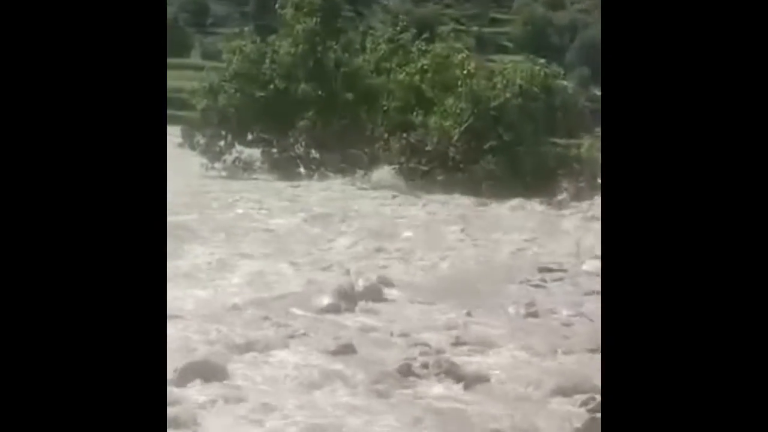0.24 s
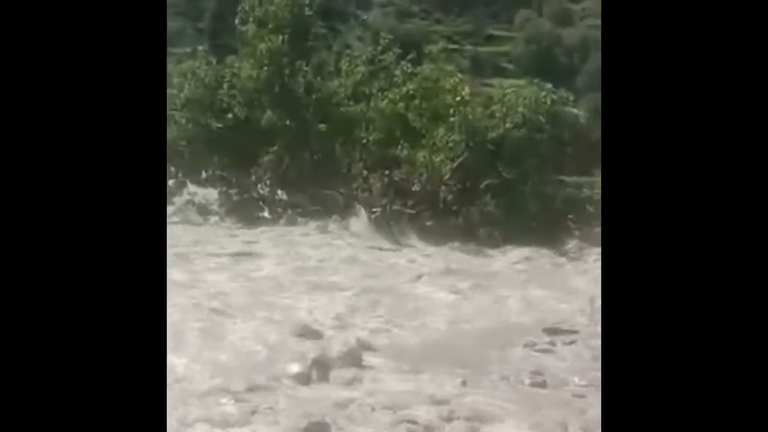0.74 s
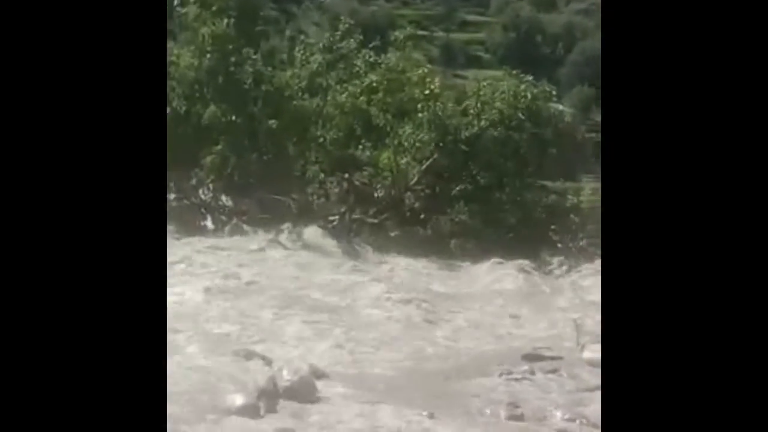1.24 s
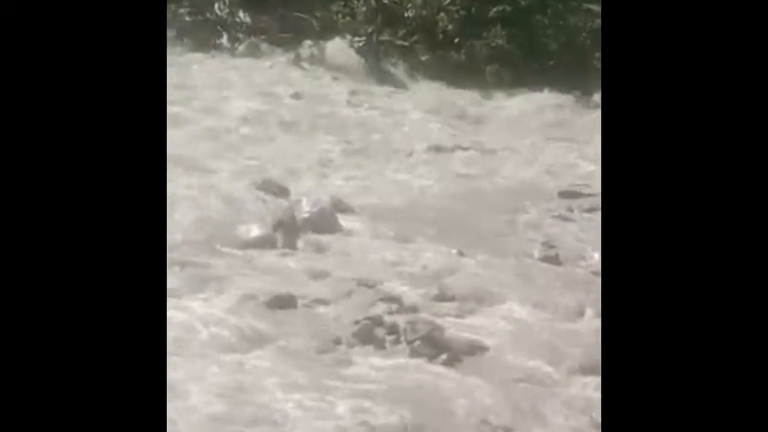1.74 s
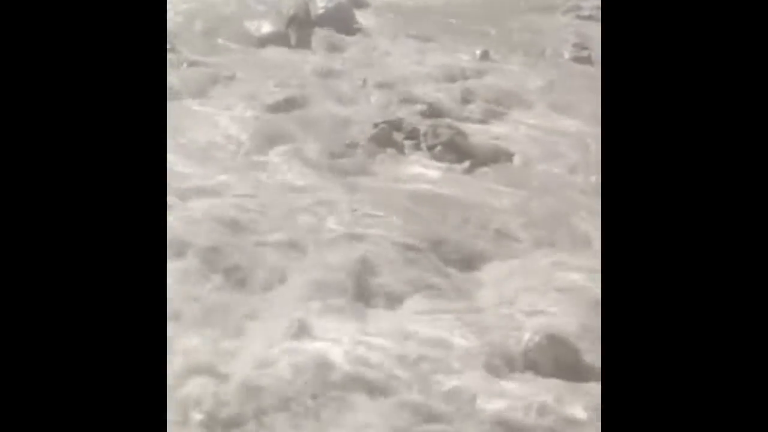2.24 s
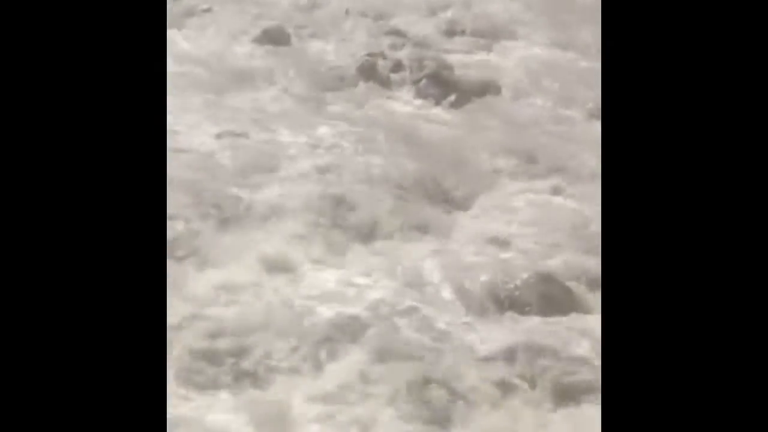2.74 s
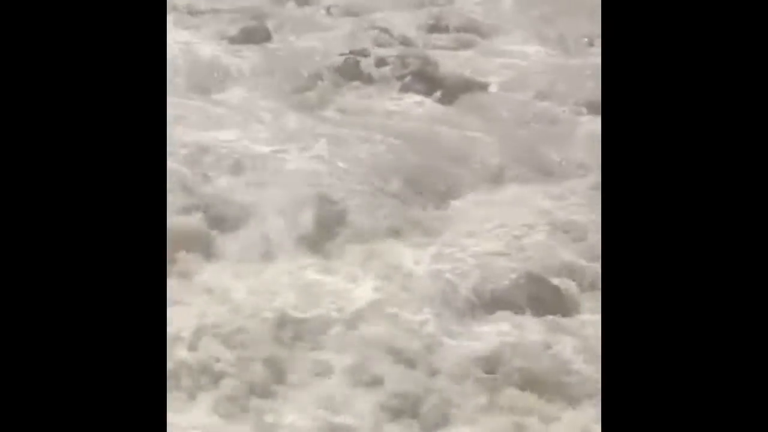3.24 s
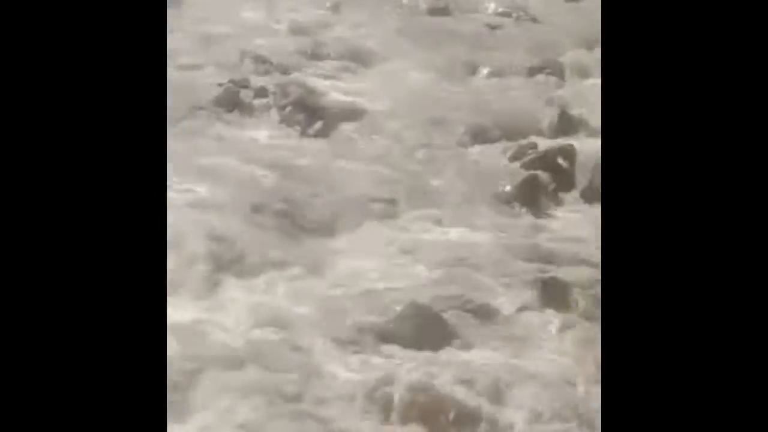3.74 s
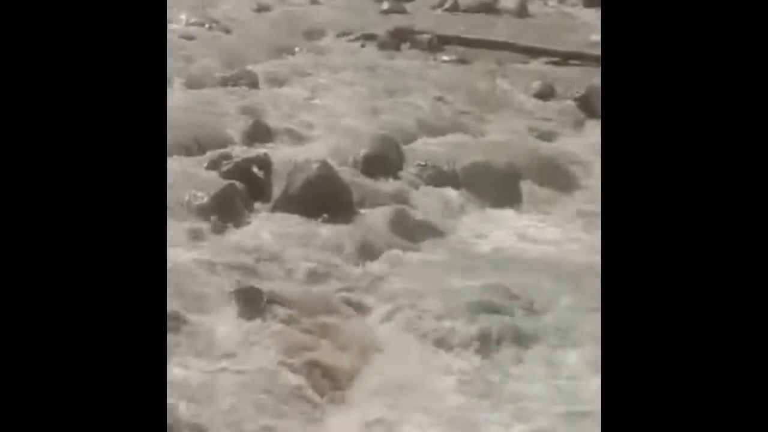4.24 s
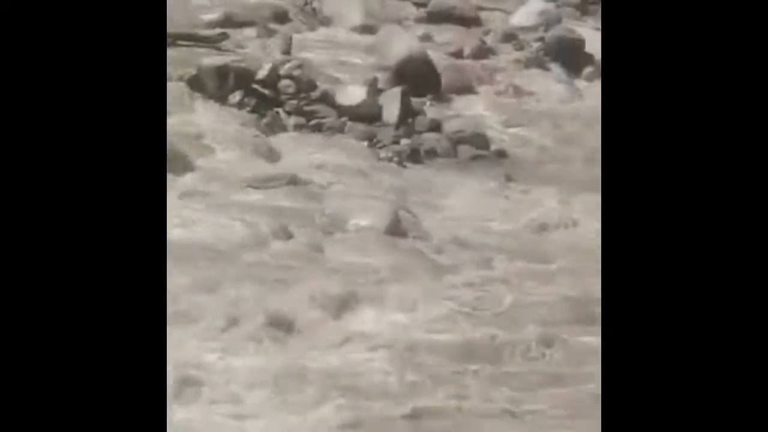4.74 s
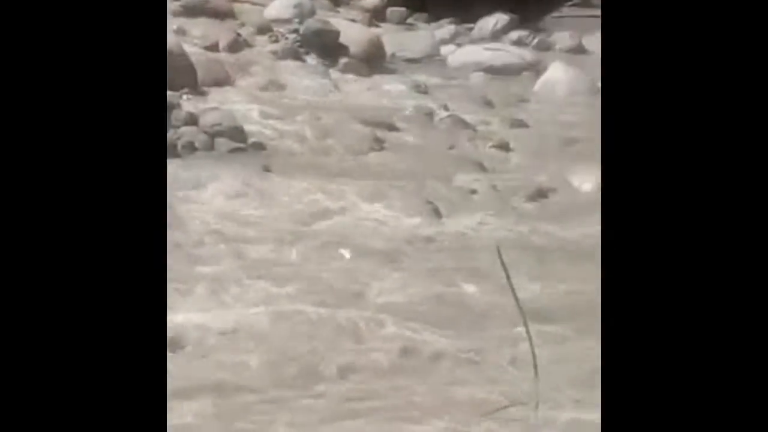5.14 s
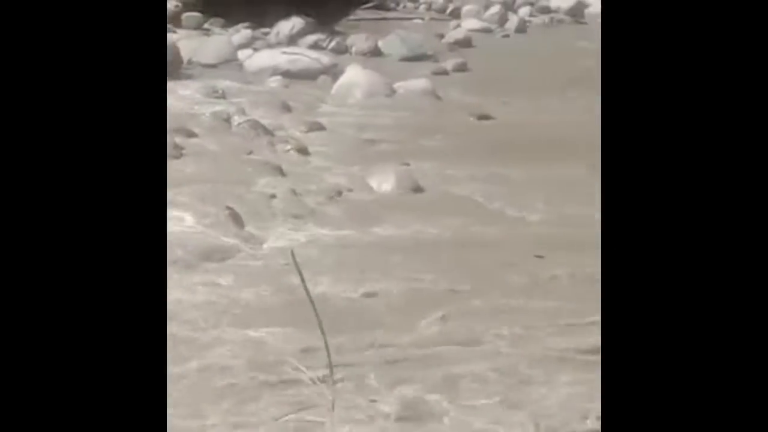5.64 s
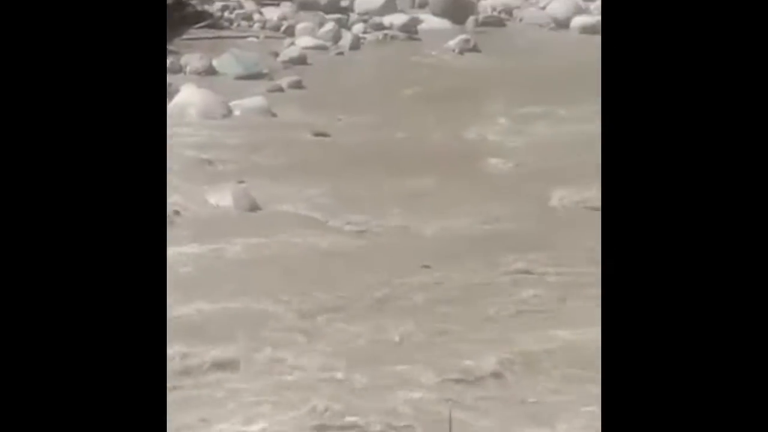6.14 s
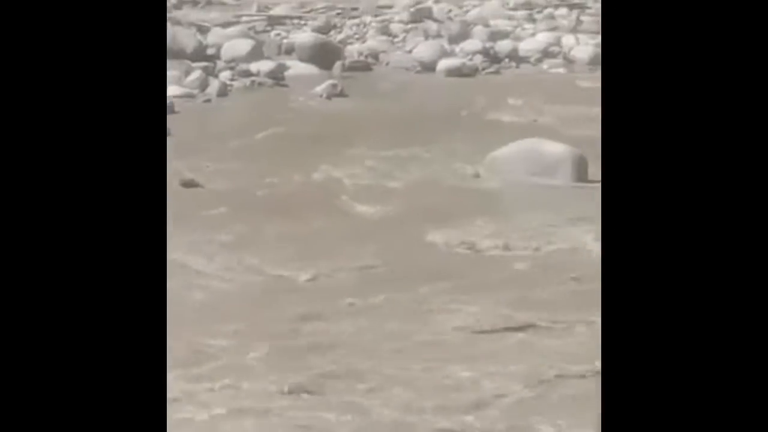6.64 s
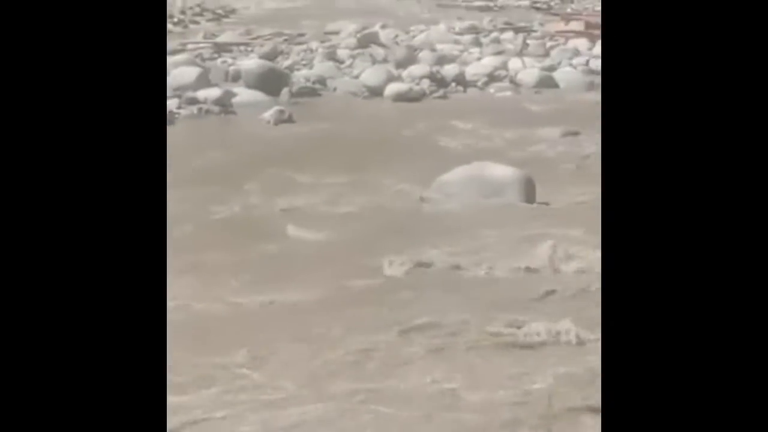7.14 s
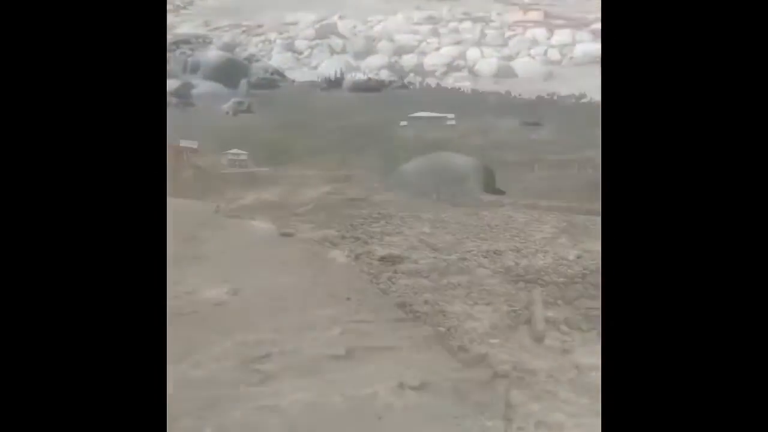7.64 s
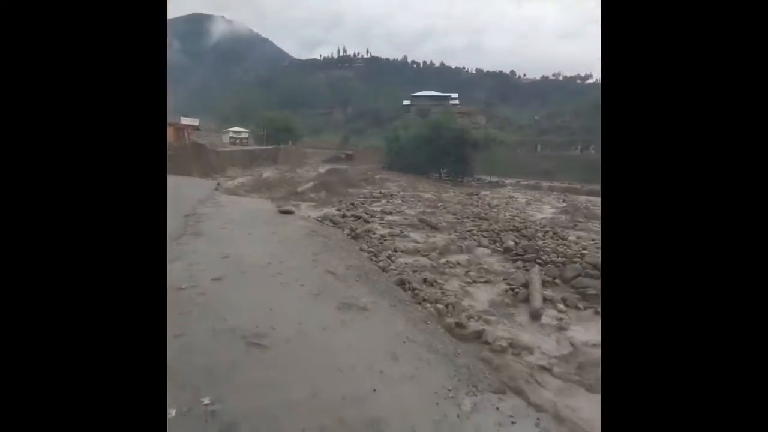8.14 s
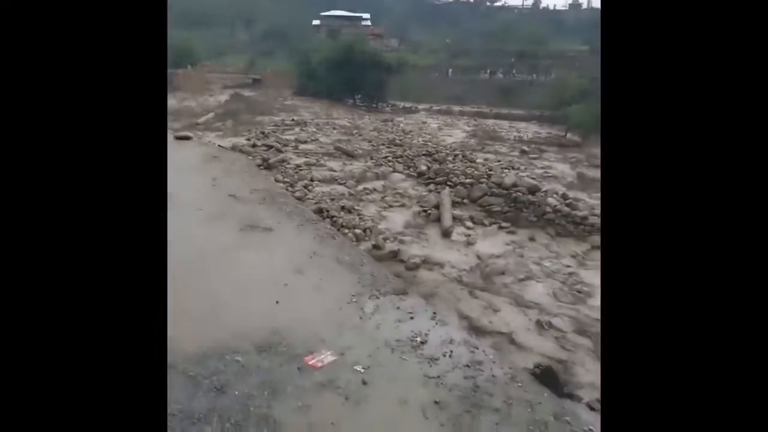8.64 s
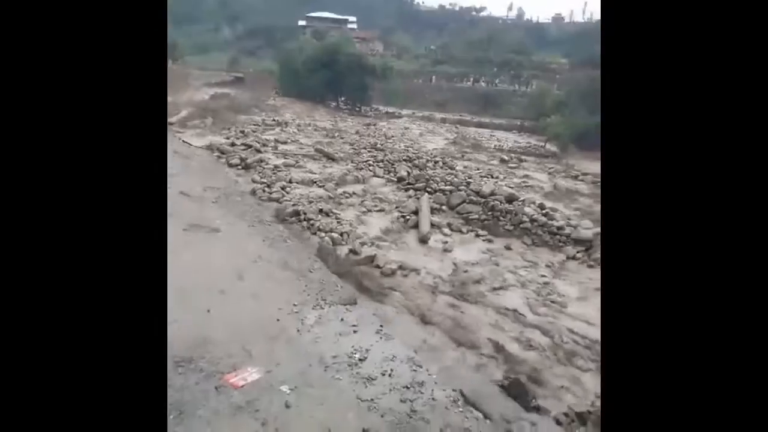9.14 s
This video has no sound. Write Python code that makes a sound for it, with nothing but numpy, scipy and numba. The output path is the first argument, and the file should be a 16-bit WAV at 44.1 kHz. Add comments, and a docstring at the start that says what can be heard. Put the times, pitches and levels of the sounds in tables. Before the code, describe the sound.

Muddy floodwater roars dully over boulders with an uneven low rumble, then gives way to a deeper, surging flow of mud and gravel.

```python
"""A muddy flood pours over boulders, dull and in mono: first rapids, then stony shallows from about 3.8 s,
then the open channel from about 6.3 s. Throughout, a low rumble swells and dips irregularly, clouds of
resonating bubbles roar, and droplets tinkle in the spray under a faint fizz and hiss. From 7.3 to 8.3 s
the river dissolves into a wider, deeper flow of mud: a surging rumble, rushing water, a brief splash and
hissing gravel, bright on the right and muffled on the left."""
import sys
import numpy as np
from scipy import signal
from scipy.fft import rfft, irfft
from scipy.io import wavfile
from scipy.ndimage import uniform_filter1d
from numba import njit

SR = 44100
rng = np.random.default_rng(int(sys.argv[2]) if len(sys.argv) > 2 else 0)


def wrap_up_sound(samples):
    """Save the sound to the file named by the first command line argument, as 16-bit audio."""
    columns = np.atleast_2d(samples).T
    # keep every value between -1 and 1, then stretch to whole-number steps
    tamed = np.clip(columns, -1, 1)
    steps = np.round(tamed * 32767).astype(np.int16)
    wavfile.write(sys.argv[1], SR, steps)


N = 414540
T = np.arange(N) / SR
FREQS = np.fft.rfftfreq(N, 1 / SR) + 1e-3


def undb(db):
    """Amplitude ratio of a level in decibels."""
    return 10 ** (np.asarray(db) / 20)


def unit(x):
    """Normalisation to rms 1."""
    return x / np.sqrt(np.mean(x ** 2))


def curves(table):
    """Linear interpolation in time, one curve per column."""
    times, *columns = np.transpose(table)
    return [np.interp(T, times, column) for column in columns]


def swells(events, half_s):
    """Superposition of Gaussian bells, one per event; one curve per column."""
    times, *columns = np.transpose(events)
    bells = np.exp(-((T - times[:, None]) / half_s) ** 2)
    return [heights @ bells for heights in columns]


def response(points):
    """Frequency response through (Hz, dB) points, interpolated over log frequency."""
    hz, db = np.transpose(points)
    return undb(np.interp(np.log(FREQS), np.log(hz), db))


def band(lo_hz, hi_hz, order=8):
    """Magnitude response of a Butterworth band-pass."""
    return ((1 + (lo_hz / FREQS) ** (2 * order)) * (1 + (FREQS / hi_hz) ** (2 * order))) ** -.5


def shape(x, gain):
    """Filtering as multiplication of the spectrum."""
    return irfft(rfft(x) * gain, N)


def smooth(x, size):
    """Low-pass filtering by two moving averages of size samples."""
    return uniform_filter1d(uniform_filter1d(x, size), size)


def wander(rate):
    """Smoothed sample-and-hold noise: rate values a second, spread near 1."""
    hold = int(SR / rate)
    steps = np.repeat(rng.standard_normal(N // hold + 1), hold)
    return 1.41 * smooth(steps, hold)[:N]


def steady(x, span_s):
    """Compression: division by the running rms evens out swells and keeps the grain."""
    return x / np.sqrt(smooth(x ** 2, int(span_s * SR)) + np.mean(x ** 2) / 20)


@njit
def ring(start, hz, cycles, size, glide):
    """Bubble resonance: each is a damped sine whose pitch rises as it nears the surface."""
    out = np.zeros(N)
    for k in range(len(start)):
        length = int(cycles[k] * SR / hz[k])
        step = 2 * np.pi * hz[k] / SR
        phasor = size[k] + 0j
        turn = np.exp(1j * step - 5.8 / length)  # decays 50 dB over its life
        rise = np.exp(1j * step * glide / length)
        for i in range(start[k], min(start[k] + length, N)):
            phasor *= turn
            turn *= rise
            out[i] += phasor.imag
    return out


def bubbles(lo_hz, hi_hz, cycles, spread_db, count):
    """Incoherent sum: bubbles of scattered sizes give about equal power per Hz."""
    when, pitch, life, strength = rng.random((count, 4)).T
    hz = lo_hz * (hi_hz / lo_hz) ** pitch
    size = hz * undb(-spread_db * np.log(1 - .99 * strength))
    cloud = ring((when * N).astype(np.int64), hz, cycles * (.5 + life), size, glide=.2)
    return unit(cloud) * np.sqrt((hi_hz - lo_hz) / (SR / 2))


def water(cloud, wash_db):
    """Central limit theorem: countless far bubbles merge into Gaussian noise behind the near ones."""
    return cloud + undb(wash_db) * rng.standard_normal(N)


# Spectra of the three stretches of river. Each row: frequency in Hz, relative density in dB.
RAPIDS_SPECTRUM = [(20, -46.5), (42, -32.5), (72, -17.5), (105, -4.5), (140, -6.5), (200, -2.5), (280, -1),
                   (410, -4.5), (580, -1), (820, -2.5), (1350, -1.5), (1680, -3.5), (2050, -16.5),
                   (2400, -20), (2800, -16.5), (3450, -19.5)]
SHALLOWS_SPECTRUM = [(20, -45.5), (42, -34), (75, -13.5), (120, -5.5), (230, 0), (450, -2), (900, -4.5),
                     (1230, -6), (1480, -6), (1610, -2.8), (1725, -1.2), (1830, -10.5), (1950, -14.5),
                     (2450, -20.5), (2950, -24.5), (3500, -21)]
CHANNEL_SPECTRUM = [(20, -51), (45, -37), (80, -14), (125, -4.5), (280, 1.5), (500, -2.5), (900, -2.5),
                    (1250, -2.5), (1600, -2), (1720, -3.5), (1860, -10), (2100, -19.5), (2400, -22.5),
                    (3080, -26), (3500, -21.5)]
def register(source, weights, passband):
    """Source and filter: one band of the water's spectrum, coloured by each stretch and blended."""
    colours = RAPIDS_SPECTRUM, SHALLOWS_SPECTRUM, CHANNEL_SPECTRUM
    stretches = [unit(irfft(source * response(colour) * passband, N)) for colour in colours]
    return unit(sum(weight * stretch for weight, stretch in zip(weights, stretches)))


# Irregular swells in the low rumble. Each row: time in seconds, lifts of deep, roll and low roar in dB.
LOW_SWELLS = [(.03, 4, 3.5, 0.5), (.24, 1, 0.5, 0.5), (.45, 9.5, 3.5, 0), (.51, 1, 3.5, 1),
              (.6, -4, 1.5, 1.5), (1.0, 3, -3, 1), (1.15, 9, 1, 0), (1.22, 8, 1, 1.5), (1.36, 8, -0.5, -2),
              (1.58, 6.5, 0.5, -0.5), (1.77, 7.5, 2.5, 1), (2.27, 6.5, 4.5, 3), (2.56, 5, -3, 2),
              (2.77, 7.5, 1, 3), (2.9, 6, 1.5, 1.5), (3.09, 4, 4.5, 0.5), (3.2, -2, 1.5, 2),
              (3.37, -2, 1, 3.5), (3.48, 6.5, 0, 1), (3.58, 6, 4.5, 5), (3.68, 14, 2, 2),
              (3.96, 7, -3.5, -1.5), (4.05, -4, 3, -0.5), (4.17, 9, -0.5, 0.5), (4.3, 1, 6, 1.5),
              (4.66, 5, 2, -0.5), (4.81, 6.5, 2.5, -0.5), (4.96, 3, 2.5, -2.5), (5.12, 5.5, -1.5, 1.5),
              (5.46, 8.5, 4.5, 1), (5.65, 4, 1.5, -1.5), (5.73, 1, 3.5, 0), (6.07, 9.5, 2, 2),
              (6.34, 4, 1.5, 2.5), (6.56, 14.5, -1, 1), (6.67, -1, 3.5, -0.5), (7.11, 8.5, -2, 1),
              (7.38, 5.5, 2, -0.5)]
# Irregular dips in the low rumble. Each row: time in seconds, changes of deep and roll in dB.
LOW_DIPS = [(.14, -1, 1), (.36, -7, -1), (.82, -5, 0), (1.09, -6, 0), (1.42, 1, -2), (1.86, -10, -1.5),
            (2.03, -6, -4), (2.13, -4, -5), (2.44, -8, 0), (2.97, -3, 0), (3.17, -7, 2), (3.8, -5, -4),
            (4.23, -7, -6.5), (4.87, -9, -0.5), (5.55, -9, 0), (6.14, -1, -4.5), (6.47, -1, -6.5),
            (6.86, -6, 0.5)]
# Breaking crests. Each row: time in seconds, lift of the upper roar in dB.
CRESTS = [(1.55, 1.7), (7.12, 1.5)]
def rumble_and_roar(source, weights, roar_db):
    """Amplitude modulation: the river's low bands swell and dip irregularly; crests brighten the roar."""
    deep_db, roll_db, low_roar_db = swells(LOW_SWELLS, half_s=.04)
    deep_dip_db, roll_dip_db = swells(LOW_DIPS, half_s=.04)
    crest_db, = swells(CRESTS, half_s=.22)
    deep = steady(register(source, weights, band(30, 146, order=16)), span_s=.15)
    deep *= undb(-39.5 + deep_db + deep_dip_db + .6 * wander(16))
    roll = steady(register(source, weights, band(155.5, 289, order=16)), span_s=.089)
    roll *= undb(-29.5 + roll_db + roll_dip_db + wander(16))
    roar = steady(register(source, weights, band(308, 2010, order=32)), span_s=.2) * undb(roar_db)
    low_lift = shape(roar, band(250, 700)) * (undb(low_roar_db) - 1)
    crests = shape(roar, band(1080, 1670, order=16)) * (undb(crest_db) - 1)
    return deep + roll + roar + low_lift + crests


def flutter(x, lo_hz, hi_hz, depth_db, rate, count):
    """Independent modulation: each of count narrow bands rises and falls on its own."""
    spectrum = rfft(x)
    which = np.digitize(FREQS, np.linspace(lo_hz, hi_hz, count + 1)[1:-1])
    return sum(irfft(spectrum * (which == k), N) * undb(depth_db * wander(rate)) for k in range(count))


def spray(source, weights, level_db):
    """Random modulation: narrow bands of the high hiss waver, more deeply after about 3.8 s."""
    early_depth_db, late_depth_db = 1.5, 2.5
    depth_db = late_depth_db + (early_depth_db - late_depth_db) * weights[0]
    treble = register(source, weights, band(2076, 3543, order=56))
    treble = flutter(treble, 2000, 3600, depth_db, rate=38, count=13)
    return steady(treble, span_s=.1) * undb(level_db)


# Spectrum of the hiss. Each row: frequency in Hz, relative density in dB.
HISS_SPECTRUM = [(4500, -20.5), (9000, -13.5), (11800, -9.5), (12800, -6), (14000, -9.5), (15300, -2),
                 (15700, -17)]
def hiss():
    """Filtered white noise, barely audible."""
    return unit(shape(rng.standard_normal(N), response(HISS_SPECTRUM) * band(4000, 16000))) * undb(-82)


# Spectrum of the fizz. Each row: frequency in Hz, relative density in dB.
FIZZ_SPECTRUM = [(3700, -2.5), (3850, 0), (4100, -9), (4350, -12), (4650, -29.5), (4950, -24),
                 (5200, -12.5), (6100, -13), (6400, -1), (6850, 0), (7250, -11.5), (7750, -8.5),
                 (8300, -18), (9200, -32.5)]
def fizz(level_db):
    """Resonance rises as radius falls: tiny bubbles glint above the spray."""
    cloud = water(bubbles(3600, 9500, cycles=150, spread_db=1.1, count=14000), wash_db=-2.5)
    bed = shape(cloud, response(FIZZ_SPECTRUM) * band(3600, 9500, order=48))
    top = shape(bed, band(6250, 8400, order=48))
    glints = unit(flutter(top, 6250, 8400, depth_db=3.5, rate=40, count=16)) * np.std(top)
    return unit(bed - top + glints) * undb(level_db)


# Splashes at the top of the spray. Each row: time of the peak in seconds, level in dB.
SPRAY_FLARES = [(.08, -59), (.27, -58), (.49, -60), (1.2, -63), (1.33, -62), (3.39, -65)]
def flares():
    """Narrow-band resonance: bubbles of nearly one size flare in brief splashes."""
    lo_hz, hi_hz = 3660, 3960
    times, level_db = np.transpose(SPRAY_FLARES)
    envelope, = swells(np.transpose([times, undb(level_db)]), half_s=.069)
    cloud = bubbles(lo_hz, hi_hz, cycles=82, spread_db=1, count=2500)
    return unit(shape(cloud, band(lo_hz, hi_hz, order=48))) * envelope


# The stretch the microphone faces. Each row: time in seconds, weights of rapids, shallows and channel.
STRETCH_WEIGHTS = [(0, 1, 0.053, 0.1), (3.64, 1, 0.011, 0.12), (3.9, 0.021, 0.79, 0.022),
                   (6.1, 0.069, 1, 0.029), (6.5, 0.081, 0.064, 0.99)]
# Force of the river. Each row: time in seconds, levels of roar, spray and fizz in dB.
RIVER_LEVELS = [(0, -19.5, -36.5, -61), (.53, -19.5, -37.5, -62), (.69, -21, -38.5, -63.5),
                (.9, -20.5, -37.5, -65), (2.1, -21, -38.5, -63.5), (2.75, -20.5, -38, -61),
                (3.6, -21, -38.5, -64.5), (3.88, -22, -42, -68.5), (4.9, -22.5, -43, -70.5),
                (6.17, -22.5, -42.5, -68), (6.37, -21.5, -42.5, -67.5), (6.87, -22, -45, -69),
                (7.28, -21, -42, -67)]
def river():
    """Superposition of the river's layers; a common modulation heaves roar and spray together."""
    roar_db, spray_db, fizz_db = curves(RIVER_LEVELS)
    weights = np.clip(curves(STRETCH_WEIGHTS), 0, 1)
    churn = bubbles(50.2, 2104, cycles=11.9, spread_db=1, count=36000)
    droplets = bubbles(2000, 3800, cycles=50, spread_db=-.2, count=8000)
    source = rfft(water(churn + droplets, wash_db=1))
    heave = wander(11)
    body = rumble_and_roar(source, weights, roar_db + .42 * heave)
    tinkle = spray(source, weights, spray_db + .73 * heave)
    return body + tinkle + hiss() + fizz(fizz_db) + flares()


# Spectrum of the mud's rumble. Each row: frequency in Hz, relative density in dB.
RUMBLE_SPECTRUM = [(20, -31), (45, -11.5), (70, 0), (105, 4), (145, -1.5), (210, 1.5), (270, -2), (340, -9),
                   (430, -14), (520, -21.5), (750, -17), (1000, -27.5), (1500, -27)]
# Surges of mud, then the slack between them. Each row: time in seconds, changes of thud and boom in dB.
SURGES = [(8.0, 2, 4), (8.1, -1, 5.5), (8.145, 6, 4), (8.23, 7, 1.5), (8.3, 3, 8.5), (8.387, 5, 4.5),
          (8.46, 5, 8), (8.525, 6, 3.5), (8.58, 5, 0.5), (8.632, 10.5, 2.5), (8.695, 3, 3.5), (8.75, 5, 2),
          (8.875, 6, 8), (8.95, 4, 8), (9.03, 8, 0), (9.075, 2.5, 5.5), (9.14, 2, 3), (9.195, 6, 6),
          (9.255, 3, 6.5), (9.34, 7, 2.5), (9.39, 1, 4.5)]
SURGE_LULLS = [(8.265, -10, -1), (8.8, -2, 0), (8.83, 2, -3), (9.12, 0, -3), (9.295, -2, -1)]
def mud_rumble():
    """Heavy damping: large bubbles die in a few cycles, a thud and a boom that swell with each surge."""
    crossover_hz = 150
    thud_db, boom_db = swells(SURGES, half_s=.025)
    thud_lull_db, boom_lull_db = swells(SURGE_LULLS, half_s=.025)
    gulps = water(bubbles(35.7, 1220, cycles=4.2, spread_db=2.5, count=7000), wash_db=3)
    colour = response(RUMBLE_SPECTRUM)
    thud = steady(shape(gulps, colour * band(12, crossover_hz)), span_s=.042)
    boom = steady(shape(gulps, colour * band(crossover_hz, 1560)), span_s=.051)
    return thud * undb(-24 + thud_db + thud_lull_db) + boom * undb(-22 + boom_db + boom_lull_db)


# Spectrum of the rushing water. Each row: frequency in Hz, relative density in dB.
RUSH_SPECTRUM = [(150, -12), (400, -2), (880, 0.5), (1300, -5), (1800, -4.5), (2300, -5), (2900, -5.5),
                 (3700, -10), (5000, -30), (8000, -56)]
def rush(level_db):
    """Decorrelation: water from all over the bed is plain noise on the left, bubbling on the right."""
    slosh = water(bubbles(289, 4770, cycles=14.5, spread_db=.5, count=26000), wash_db=2)
    gain = undb(level_db + .33 * wander(16))
    colour = response(RUSH_SPECTRUM) * band(100, 8000)
    return [unit(shape(side, colour)) * gain for side in (rng.standard_normal(N), slosh)]


# Spectrum of the gravel. Each row: frequency in Hz, relative density in dB.
GRAVEL_SPECTRUM = [(2000, -11), (3500, -1.5), (5500, -3), (6400, -4.5), (7250, -2.5), (8000, -13.5),
                   (8600, -18.5), (10000, -13.5), (12200, -10), (14000, -18), (15700, -22)]
def gravel(level_db):
    """Short pulses have broad spectra: dense, quickly damped pings merge into the hiss of gravel."""
    crackle = water(bubbles(1900, 15000, cycles=3.9, spread_db=1.5, count=50000), wash_db=7)
    colour = response(GRAVEL_SPECTRUM) * band(1800, 17000, order=4)
    return unit(shape(crackle, colour)) * undb(level_db + .26 * wander(10))


# A sheet of water over the gravel. Each row: time in seconds, level in dB.
SPLASH_LEVELS = [(7.6, -32), (7.95, -29.5), (8.2, -26.5), (8.4, -32.5), (8.55, -33), (8.9, -44), (9.4, -55)]
def splash():
    """Bubble resonance in one band swells and fades as the sheet of water splashes."""
    level_db, = curves(SPLASH_LEVELS)
    return unit(bubbles(1840, 2600, cycles=20, spread_db=1, count=16000)) * undb(level_db)


# Force of the mud flow. Each row: time in seconds, levels of rush and gravel in dB.
MUD_LEVELS = [(7.6, -28, -33.5), (7.8, -28, -31), (8.05, -25.4, -31.5), (8.3, -26, -32.5), (8.68, -25, -32),
              (8.8, -24.5, -31), (8.92, -26, -32), (9.3, -25.5, -31)]
# Transmission of the microphone's muffled left port. Each row: frequency in Hz, gain in dB.
LEFT_PORT = [(50, -14), (250, -17), (450, -18.5), (800, -19.5), (1300, -21), (1800, -25), (2300, -32),
             (2800, -56), (4000, -77)]
def mud_flow():
    """Time and level differences: the left port gets the rumble later and loses the treble."""
    lag_s = .42e-3
    rush_db, gravel_db = curves(MUD_LEVELS)
    rumble = mud_rumble()
    late_rumble = shape(rumble, np.exp(-2j * np.pi * FREQS * lag_s))
    left_rush, right_rush = rush(rush_db)
    left = shape(late_rumble + left_rush, response(LEFT_PORT))
    right = rumble + right_rush + gravel(gravel_db) + splash()
    return np.array([left, right])


# The dissolve between the two places. Each row: time in seconds, gains of river and mud flow.
CROSSFADE = [(7.31, 0.96, 0), (7.41, 0.92, 0.11), (7.6, 0.7, 0.38), (7.78, 0.47, 0.59), (8.05, 0.23, 0.69),
             (8.32, 0.013, 1)]
def scene():
    """Crossfade: the mono river gives way to the stereo mud flow."""
    river_gain, mud_gain = curves(CROSSFADE)
    return river_gain * river() + mud_gain * mud_flow()


def record(dry):
    """Band limiting: the recorder's elliptic low-pass cuts the top."""
    cutoff_hz = 15700
    return signal.sosfilt(signal.ellip(10, .1, 80, cutoff_hz, fs=SR, output="sos"), dry)


dry = scene()
out = record(dry)
wrap_up_sound(out)
```